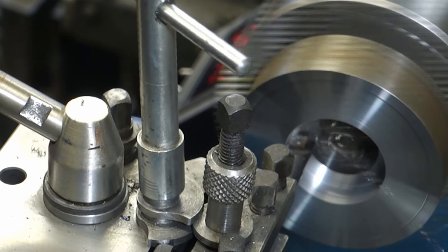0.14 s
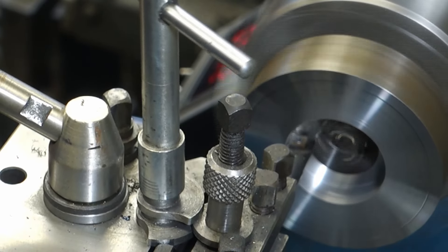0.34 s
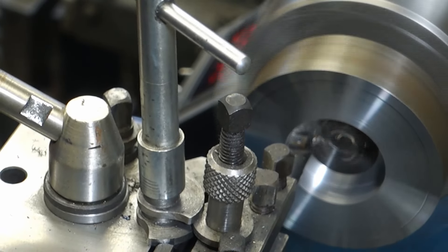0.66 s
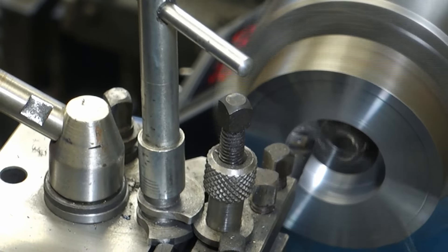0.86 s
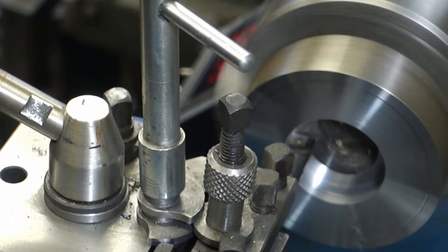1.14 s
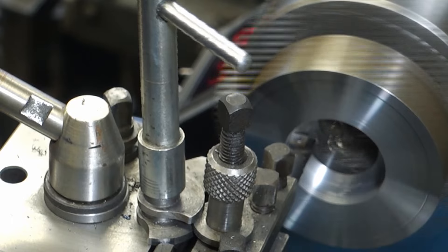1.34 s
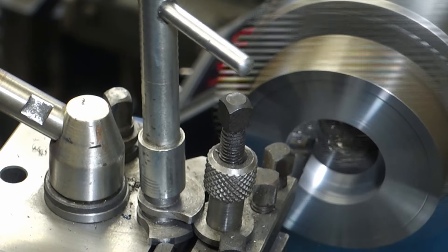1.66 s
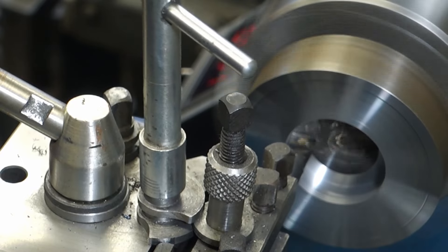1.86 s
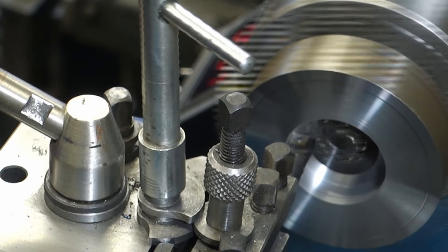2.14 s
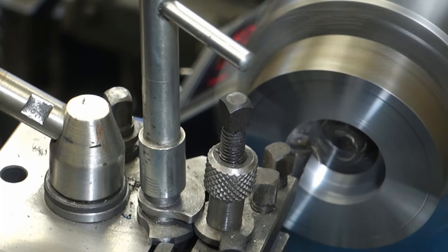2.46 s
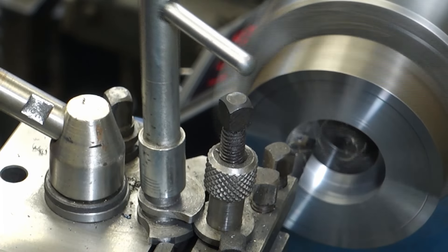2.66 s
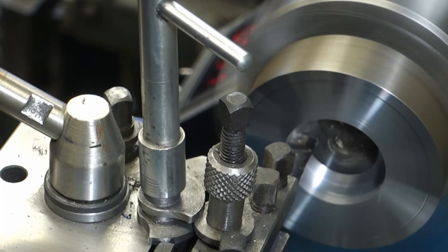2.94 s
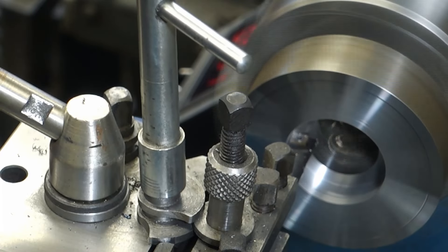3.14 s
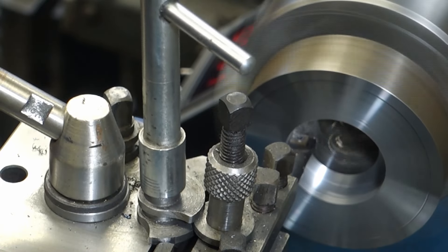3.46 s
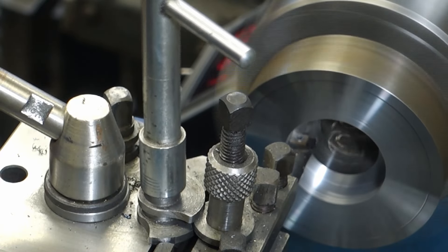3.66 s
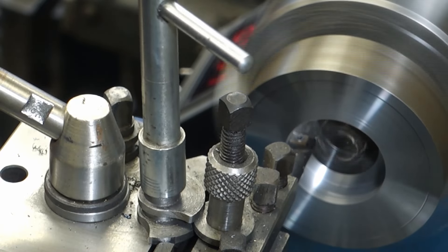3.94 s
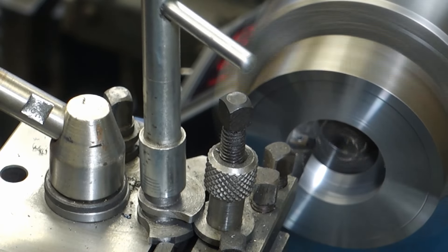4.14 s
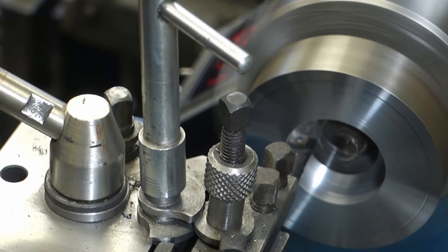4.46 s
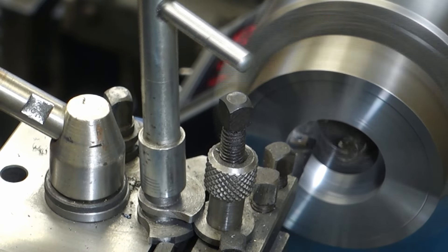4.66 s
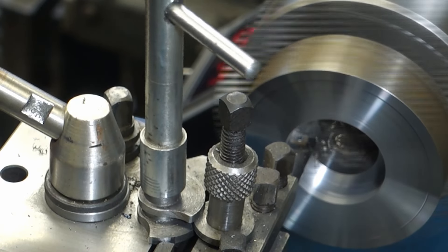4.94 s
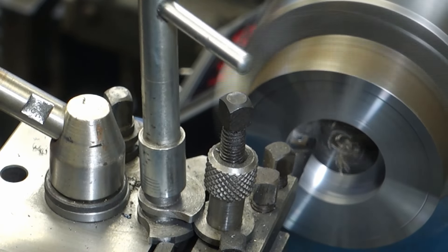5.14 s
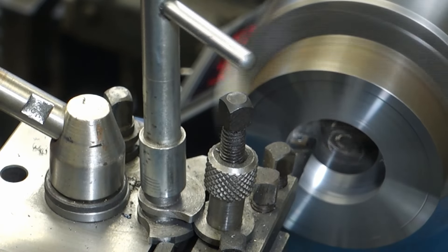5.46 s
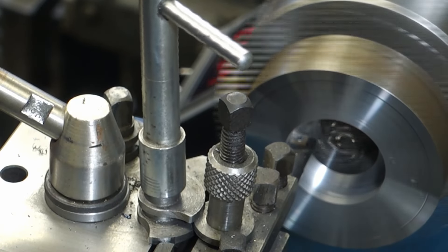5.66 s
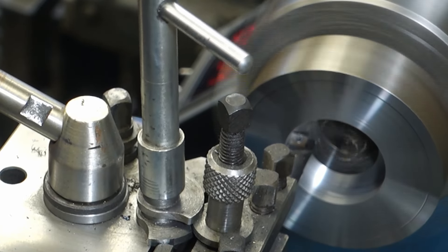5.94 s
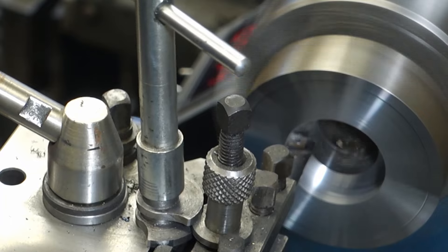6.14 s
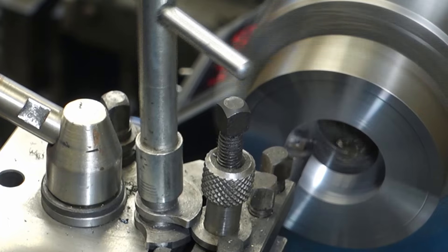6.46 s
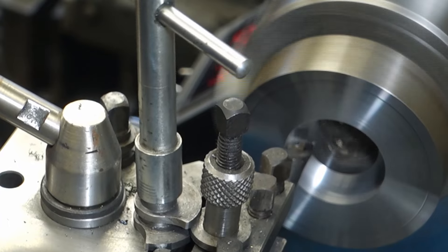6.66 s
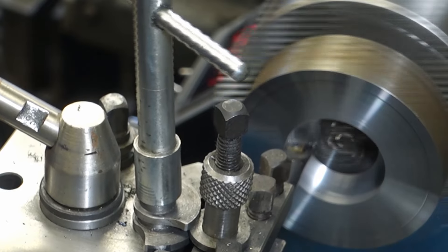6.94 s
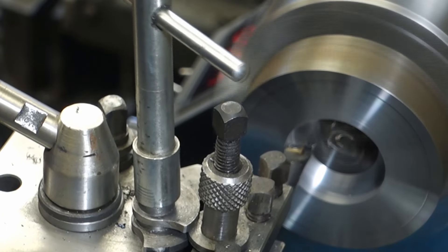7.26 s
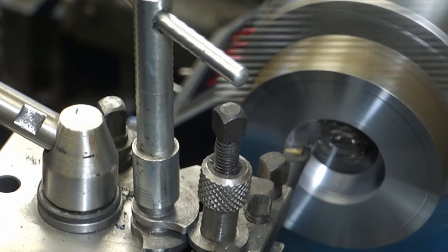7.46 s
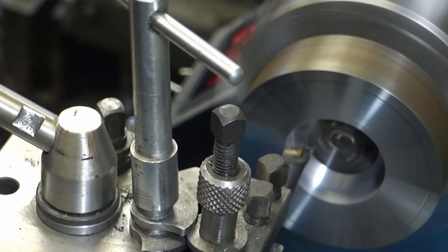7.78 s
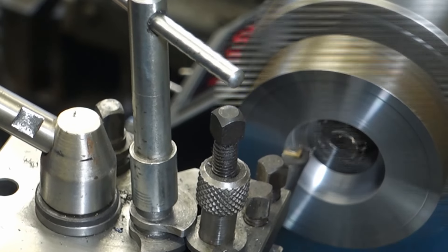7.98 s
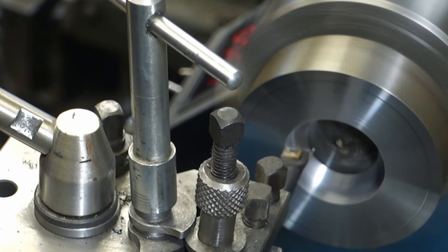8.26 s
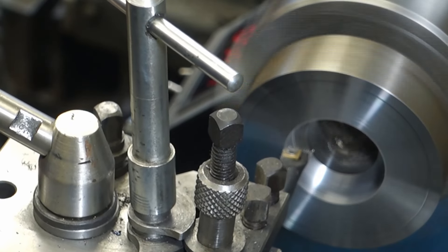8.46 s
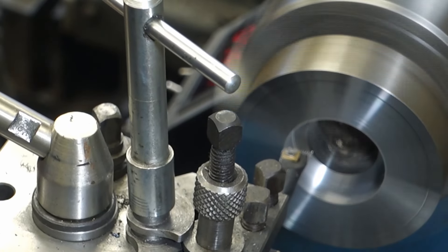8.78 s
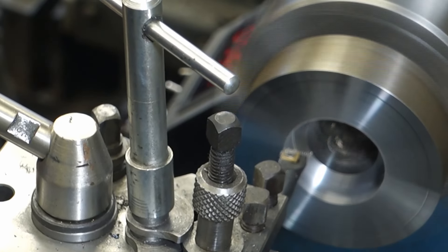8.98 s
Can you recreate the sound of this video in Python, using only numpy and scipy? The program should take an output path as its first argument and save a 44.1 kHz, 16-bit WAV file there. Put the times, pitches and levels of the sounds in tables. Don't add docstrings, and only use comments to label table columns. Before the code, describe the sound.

A loud, raspy metal squeal dominates, with shimmering high rings, scrape hiss and tiny bright chip ticks. Behind it motor and gears rumble with a fast throb, pushed down whenever the squeal swells. The squeal dips around three seconds, peaks near five, sinks slightly in pitch, slips, returns brighter, then breaks up and ends as the tool exits. Heard very close, in stereo, with little room echo.

```python
import sys
import numpy as np
from scipy import signal
from scipy.fft import irfft, next_fast_len
from scipy.io import wavfile
from scipy.ndimage import uniform_filter1d

SR = 44100
rng = np.random.default_rng(int(sys.argv[2]) if len(sys.argv) > 2 else 0)


def to_wav(s):
    ch = np.atleast_2d(s).T
    pcm = np.round(np.clip(ch, -1, 1) * 32767)
    wavfile.write(sys.argv[1], SR, pcm.astype(np.int16))


def ratio(d):
    e = np.asarray(d, float) / 20
    return 10 ** e


N = 401751
SIZE = next_fast_len(N)
HZ, T = np.fft.rfftfreq(SIZE, 1 / SR), np.arange(N) / SR
SPINDLE_HZ = 7.5

# t/s, length/s, f/Hz, share of the squeal/0-1
LOCKS = [
    (3.328, .085, 1900, .92),
    (4.765, .085, 1930, .96),
    (4.85, .035, 1925, .85),
    (5.52, .06, 1845, .8),
    (5.615, .075, 1840, .85),
]
# t/s, length/s, drop/dB
LULLS = [
    (2.788, 0.564, 9),
    (3.623, 0.327, 7),
    (5.673, 0.16, 5),
]
# from/s, to/s, fall/Hz
DROOP = (4.84, 5.7, 50)


def evened(x):
    return x / np.sqrt(np.mean(x ** 2) + 1e-20)


def read(points):
    f, *columns = np.transpose(points)
    return np.squeeze([np.interp(np.log(HZ + 1), np.log(f + 1), c) for c in columns])


def modes(table):
    gains = [ratio(db) / (1 + ((HZ - hz) / width * 2) ** 2) for hz, width, db in table]
    return np.sqrt(sum(gain ** 2 for gain in gains))


def noise(gain, diffuse=1):
    # f/Hz, likeness/0-1, left lead/rad, left over right/dB
    ports = [(120, .9995, 0, 0), (300, .995, -.01, -.1), (600, .99, -.04, -.2), (1300, .9, -.2, -2.5),
             (1930, .985, -.4, .2), (2400, .9, 0., -1.5), (2900, .65, -.1, 5.5), (3400, .55, -1.5, -3.5),
             (4100, .4, -1.6, -7), (7900, .88, -.3, -.5), (8700, .7, -.5, 1.5), (9800, .85, -1.4, -.5),
             (11300, .75, -1., -7), (14000, .6, -.8, -3.)]
    a, b, c, d = rng.standard_normal((4, len(HZ)))
    same, lead, lean_db = read(ports)
    same = np.clip(same, 0, 1) ** diffuse
    half = np.exp(.5j * lead) * ratio(lean_db / 2)
    left = a + 1j * b
    right = same * left + np.sqrt(1 - same ** 2) * (c + 1j * d)
    return evened(irfft(gain * np.array([left * half, right / half]), SIZE)[:, :N])


def flutter(hz):
    a, b = rng.standard_normal((2, len(HZ)))
    return evened(irfft((a + 1j * b) / (1 + (HZ / hz) ** 2), SIZE)[:N])


def resonate(x, hz, width):
    turn, r = np.exp(2j * np.pi * np.cumsum(hz) / SR), np.exp(-np.pi * width / SR)
    once = signal.lfilter([1 - r], [1, -r], x / turn)
    smooth = signal.lfilter([1 - r], [1, -r], once)
    return 2 * (turn * smooth).real


def spells(rows, edge_s):
    return sum(h * np.clip(np.minimum(T - s, s + length - T) / edge_s, 0, 1) for s, length, h in rows)


def droop():
    start_s, end_s, _ = DROOP
    return np.clip((T - start_s) / (end_s - start_s), 0, 1) * (T < end_s)


def controls():
    # t/s, squeal over rumble/dB
    chatter = [(0.0, 17), (0.5, 14.5), (0.65, 14), (0.85, 17), (1.3, 13.5), (1.85, 16.5), (2.7, 17),
               (3.5, 17), (4.05, 20.5), (4.45, 15.5), (4.72, 12.5), (4.9, 22.5), (5.7, 14.5), (6.1, 11),
               (6.4, 16.5), (7.2, 11.5), (7.5, 14), (8.95, 4)]
    # centre/s, half width/s
    zones = [
        (4.9, 1.24),
        (7.1, 1.1),
        (8.8, 0.85),
    ]
    # centre/s, half width/s
    regrip = (6.18, 0.2)
    # t/s, length/s, share/0-1
    lifts = [
        (5.69, 0.11, .6),
        (9.02, .3, .98),
    ]
    # level/dB, slope/dB per dB of chatter,
    # then change/dB in a lull, deep, shallow, at the mouth, lifted, digging in
    follow = dict(rumble=(-25, -0.58, -2, -1.47, -0.2, -1.26, -0.7, -0.6),
              post=(-33, 0.36, -2, -0.1, -2.5, 4, -6.5, 1), tip=(-33, -0.23, -0.5, 2, -1, -3, -11, 4),
              shallow=(-40, -0.15, 0, 1.5, 9.5, 4.5, -14.5, -3),
              hiss=(-38, 0.06, -0.5, -2, 1, 3.3, -0.5, 1), wall=(-45.5, -1, 3, 9.5, -5, -5, -6, 0),
              nose=(-40, .05, 1, -8, 7.5, 12.5, -12.5, .3), mouth=(-40, -0.18, -2, -5.5, -.5, 6, -7.5, 1.5),
              holder=(-24, 0.01, -3.5, -3.5, -0.4, -2.5, -5, 1.5),
              low=(-22.5, -0.44, -8.5, -2.5, 1.5, -9, -7, 1.5),
              upper=(-36.5, -0.36, -2, 1.5, 4, -3.5, -17, 1.2))
    sag_s, return_s = 0.16, 0.025
    lull_db = 0
    for s, length, drop_db in LULLS:
        sag = np.minimum((T - s) / sag_s, (s + length - T) / return_s)
        lull_db = lull_db + drop_db * np.clip(sag, 0, 1)
    surge = spells([(s, length, share) for s, length, _, share in LOCKS[1:2]], 0.014)
    gust = flutter(16)
    gust_db = evened(gust - uniform_filter1d(gust, size=SR // 4))
    over_db = np.interp(T, *np.transpose(chatter)) - lull_db + 12.5 * surge + gust_db
    deep, shallow, mouth, digging = [np.exp(-((T - s) / width) ** 2) for s, width in [*zones, regrip]]
    causes = np.array([np.ones(N), over_db - 13.5, np.tanh(lull_db / 4),
                       deep, shallow, mouth, spells(lifts, .025), digging])
    db = {name: np.dot(row, causes) for name, row in follow.items()}
    rub_db = flutter(22)
    for name in ("tip", "shallow", "upper"):
        db[name] = db[name] + rub_db
    return over_db, db


def squeal(level_db, pitch_hz):
    # f/Hz, width/Hz, level/dB
    bar_modes = [(1851, 62, 1), (1888, 49, -5.5), (1945.6, 43, -3), (1970.5, 57, -1.5), (2015, 61, 0)]
    # t/s, length/s, drop/dB
    skips = [
        (3.285, .045, 7),
        (8.29, .025, 7),
        (8.595, .035, 9),
        (8.685, .022, 8),
        (8.765, .03, 10),
        (8.868, .025, 8),
        (8.975, .14, 6),
    ]
    bar = noise(modes(bar_modes))
    sunk = droop()
    chatter = evened(resonate(bar, pitch_hz, 100.0))
    rough = evened(bar / (1 + 0.75 * sunk) + (0.61 + 0.22 * sunk) * chatter)
    share, clean = np.zeros(N), np.zeros((2, N))
    for s, length, hz, locked in LOCKS:
        spell = spells([(s, length, np.clip(locked, 0, .99))], .011)
        share += spell
        clean += spell * np.sqrt(2) * np.sin(2 * np.pi * hz * T + np.array([[0], [.4]]))
    share = np.minimum(share, 1)
    swing = np.sqrt(1 - share ** 2) * rough + 0.9 * clean
    swing = ratio(level_db - spells(skips, 0.0063) - 1.0) * swing
    octave = ratio(-20.0 + 2.6 * share) * resonate(swing ** 2, 2 * pitch_hz, 250.)
    return swing + octave


def holder(db):
    # f/Hz, width/Hz, level/dB
    holder_modes = [(1614, 64, -7), (2135, 47, -0.5), (2158, 44, -1.5), (2318, 87, 0), (2432, 145, -6.5),
                    (2702, 78, -7.5), (2919, 140, -6), (3385, 50, -10.5), (4070, 117, -13)]
    upper_modes = [(11780, 120, -1), (12010, 100, -5), (12160, 130, -4), (12480, 170, -3), (13210, 220, -7),
                   (14050, 130, -11)]
    sunk = droop()
    holder_db = db["holder"] - 3 * sunk + 0.47 * flutter(15)
    low_db = db["low"] + 7 * sunk - 2.0
    upper_db = db["upper"] + 1.1 * flutter(25) + 1.5
    return (ratio(holder_db) * noise(modes(holder_modes))
            + ratio(low_db) * noise(modes([(1768.0, 62, 0)]))
            + ratio(upper_db) * noise(modes(upper_modes)))


def tool(db):
    # f/Hz, width/Hz, level/dB
    post_modes = [(7805, 70, 0), (7958, 85, -1)]
    tip_modes = [(9620, 180, -3), (9790, 110, -1.5), (9870, 140, -1.5), (10280, 380, -10.5)]
    shallow_modes = [(11030, 200, 0.5), (11340, 230, 9), (11100, 120, 0)]
    # f/Hz, density/dB per Hz
    scrape = [(2500, -7), (3500, -0.5), (4300, -6.5), (4750, -10), (5600, -3), (6400, -2), (7400, 0.5),
              (8900, -2.5), (10700, -4.5), (13000, -8), (14500, -4), (15300, -9), (15900, -6.5)]
    grip = flutter(22) + 0.09 * np.sin(2 * np.pi * SPINDLE_HZ * T)
    calm_db = 5.6 * np.clip((T - 7.1) / 0.89, 0, 1)
    post_db = db["post"] - calm_db + 1.17 * grip + 1.2 * flutter(35) + 0.93
    tip_db = db["tip"] + 0.52 * grip + 0.47 * flutter(35) + 2.0
    shallow_db = db["shallow"] + 0.63 * grip + 2.0
    hiss_db = db["hiss"] + 0.62 * grip + .5 * flutter(30) + 9.0
    return (ratio(post_db) * noise(modes(post_modes))
            + ratio(tip_db) * noise(modes(tip_modes))
            + ratio(shallow_db) * noise(modes(shallow_modes))
            + ratio(hiss_db) * noise(ratio(read(scrape)), 4.9))


def bore(db):
    # f/Hz, width/Hz, level/dB
    wall_modes = [(5400, 220, 0)]
    nose_modes = [(8340, 580, 0)]
    mouth_modes = [(3750, 155, 1.7), (4410, 320, -2.2), (4880, 150, -2), (5100, 54, 2.1), (5370, 68, -0.83)]
    wall_db = db["wall"] + .6 * flutter(25) - 4.0
    nose_db = db["nose"] + 2.9 * flutter(25) - 4.5
    mouth_db = db["mouth"] + 2.33 * flutter(6.8) + 1.0
    return (ratio(wall_db) * noise(modes(wall_modes))
            + ratio(nose_db) * noise(modes(nose_modes))
            + ratio(mouth_db) * noise(modes(mouth_modes), 4.2))


def struck(events, shape):
    train = np.zeros(N)
    s, db = np.transpose(events)
    train[np.round(s * SR).astype(int)] = ratio(db)
    return signal.oaconvolve(train, shape)[:N]


def ring(hz, width):
    turns = np.cumsum(hz + width * flutter(150)) / SR
    return np.sin(2 * np.pi * turns + np.array([[0], [1.1]])) * ratio(np.array([[-3.], [2.5]]))


def small_pings():
    turns = np.arange(1, 136) / SPINDLE_HZ / 2
    chance, late, size = rng.random((len(turns), 3)).T
    on = (chance < 0.62) & (turns < 8.3)
    s, db = turns + .06 * late, -31 - 4 * size
    return [*zip(s[on], db[on])]


def chips():
    # t/s, level/dB
    snaps = [(1.1084, -18), (1.8592, -15), (2.5965, -19), (2.7372, -16), (4.2537, -16), (4.2981, -18),
             (4.7092, -15), (4.9362, -19), (5.0644, -17), (6.6588, -18), (6.8314, -16), (6.9147, -15),
             (7.0085, -16), (7.0559, -16), (7.0863, -16), (7.3262, -15), (7.4834, -16), (7.675, -17),
             (7.7488, -16), (7.8316, -17), (7.9483, -15), (8.0177, -17), (8.2092, -18), (8.2407, -16),
             (8.3494, -14), (8.4572, -17), (8.5535, -17), (8.742, -17)]
    # t/s, level/dB
    pings = [(0.2219, -24), (1.0306, -26), (1.2655, -25), (1.8587, -29), (1.8766, -26), (3.5573, -22),
             (3.6506, -25), (3.8716, -27), (4.1749, -25), (4.3051, -24), (4.4019, -27), (4.4787, -22.5),
             (4.803, -19), (4.8334, -19), (4.9372, -22), (5.0679, -15), (5.1856, -25), (5.2689, -30),
             (5.3532, -28), (6.0711, -27), (6.1933, -23), (6.3225, -26), (6.3684, -23), (6.4378, -23),
             (6.6707, -23), (7.017, -26), (7.1452, -26), (7.3208, -15)]
    # t/s, level/dB
    partners = [(4.7117, -29), (4.81, -29), (4.8319, -32), (4.8594, -29), (4.9387, -27), (4.9694, -34),
                (5.0275, -36), (5.0654, -30), (5.1906, -30), (5.2694, -34)]
    # t/s, level/dB
    knock = [
        (9.0493, -14),
    ]
    t = np.arange(2200) / SR
    puff = np.exp(-t / .007) * (1 - np.exp(-t / .002))
    swell = np.exp(-(t / 0.013) ** 2) * (1 - np.exp(-t / 0.0032))
    bright = ratio(read([(5000, -34), (8500, -1), (11000, 7), (15500, -8)]))
    partner_ring = ring(12580, 35.) + ratio(-11.0) * ring(15100, 40.)
    return (ratio(-2.5) * struck(snaps, puff) * noise(bright)
            + ratio(0.5) * struck(knock, swell) * noise(modes([(2800, 290, 0)]))
            + struck([*pings, *small_pings()], swell) * ring(13520, 45.)
            + ratio(4.0) * struck(partners, swell) * partner_ring)


def machine(level_db):
    # f/Hz, width/Hz, level/dB
    gears = [(102, 17, -20.5), (132.9, 6.1, -9), (176, 12.5, -16), (217.7, 27, -9), (230.6, 23.6, -7),
             (282.3, 34.6, -2), (361, 42, -7.5), (410.4, 19, -3.5), (477.4, 52.5, -1), (517.4, 35, -3),
             (572.7, 38, 0.5), (629.4, 49, -4.5), (747.4, 123, -6.5), (953, 51, -13), (1050, 82, -9),
             (1198, 115, -12), (1310, 96, -7), (1457, 57, -12.5)]
    # f/Hz, density/dB per Hz
    rumble = [(15, -81), (25, -57), (271, -28), (340, -29), (482, -17.5), (894, -15), (1490, -8.5),
              (1910, -12), (2160, -4.5), (3400, -7), (4420, -82), (7480, -120)]
    once = np.sin(2 * np.pi * SPINDLE_HZ * T)
    four = np.sin(8 * np.pi * SPINDLE_HZ * T + 1.3)
    body = noise(modes(gears)) + ratio(-3.0) * noise(ratio(read(rumble)))
    return ratio(level_db + .9 * once + .9 * four - 1.0 + 1.25 * flutter(25)) * body


def whine():
    # f/Hz, level/dB
    tones = [(15292, -66), (15323, -64), (15355, -61), (15386, -59), (15417, -64), (15448, -59),
             (15479, -65)]
    return sum(ratio(db + 3.) * np.sin(2 * np.pi * hz * T) for hz, db in tones)


def scene():
    over_db, db = controls()
    lull_s, lull_length_s, _ = LULLS[0]
    since = T - lull_s - lull_length_s + 0.025
    rumble_db = db["rumble"] + 2.5 * np.exp(-abs(since) / 0.11) * (since > 0)
    free_db = spells([(8.97, 1, -18)], .07)
    pitch_hz = 1922 + 22.3 * flutter(7.4) - DROOP[2] * droop()
    bar = squeal(rumble_db + over_db + free_db, pitch_hz)
    return bar + holder(db) + tool(db) + bore(db) + chips() + machine(rumble_db) + whine()


def roll_off(x):
    return signal.sosfilt(signal.butter(12, 16400, fs=SR, output="sos"), x)


def record(dry):
    power_db = 10 * np.log10(abs(uniform_filter1d((dry ** 2).mean(0), 130)) + 1e-12)
    fall = T * 440.0
    held_db = np.maximum.accumulate(power_db + fall) - fall
    over_db = np.maximum(held_db + 11.5, 0)
    ducked = dry / ratio(0.47 * uniform_filter1d(over_db, 90) - 2.0)
    thin = signal.sosfilt(signal.butter(2, 65., "highpass", fs=SR, output="sos"), ducked)
    edge = signal.firwin(1023, 15735, window=("kaiser", 9), fs=SR)
    mix = np.clip(signal.oaconvolve(thin, edge[None], "same"), -1, 1)
    return roll_off(mix)


dry = scene()
out = record(dry)
to_wav(out)
```